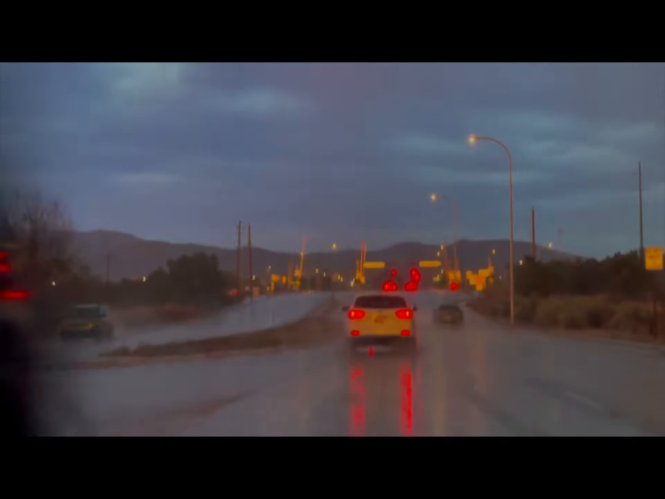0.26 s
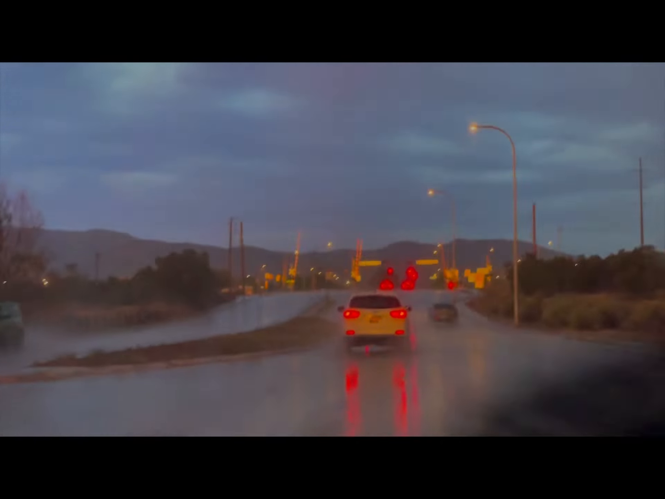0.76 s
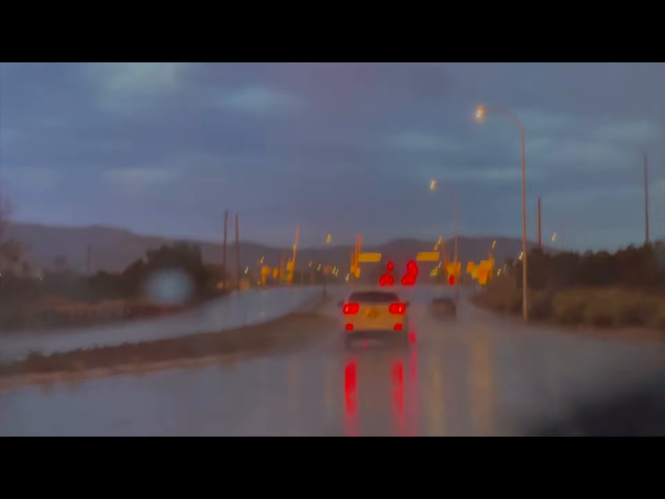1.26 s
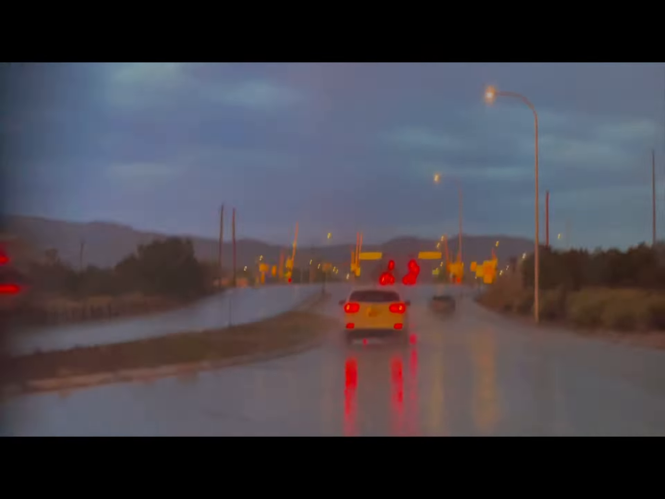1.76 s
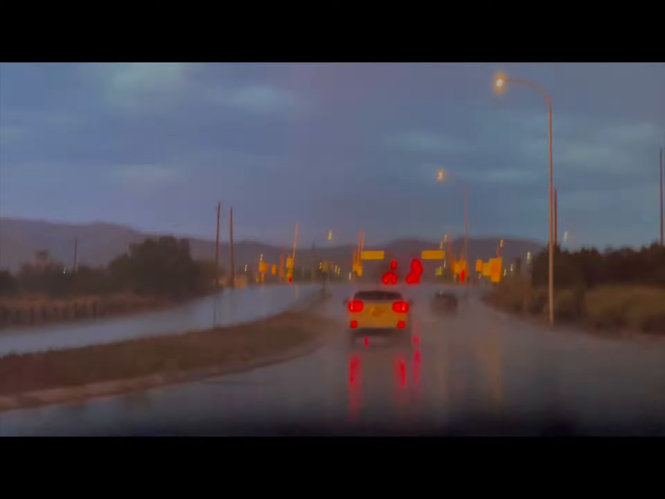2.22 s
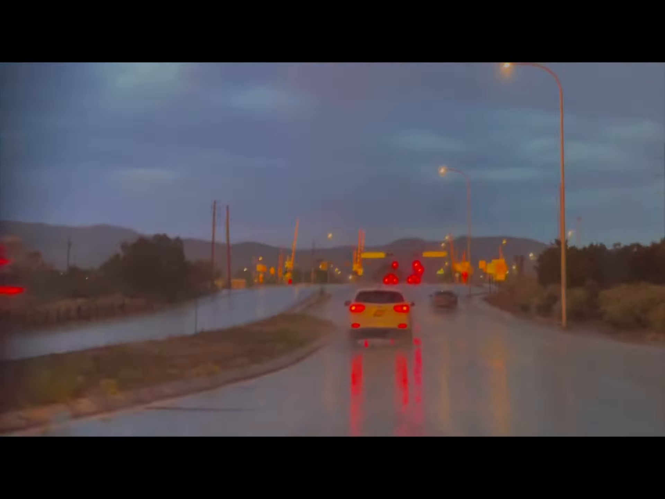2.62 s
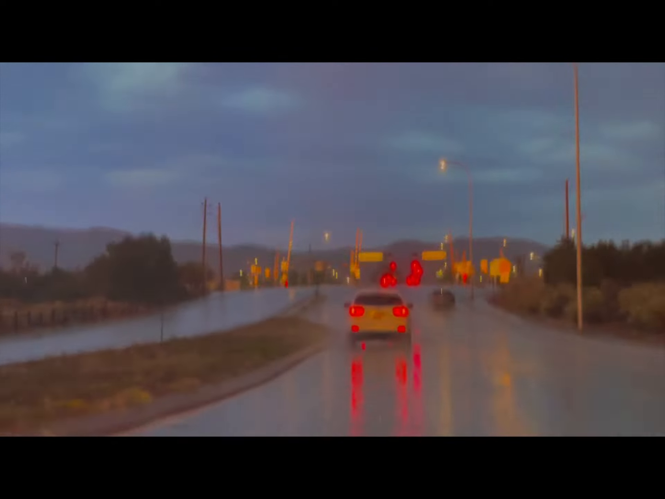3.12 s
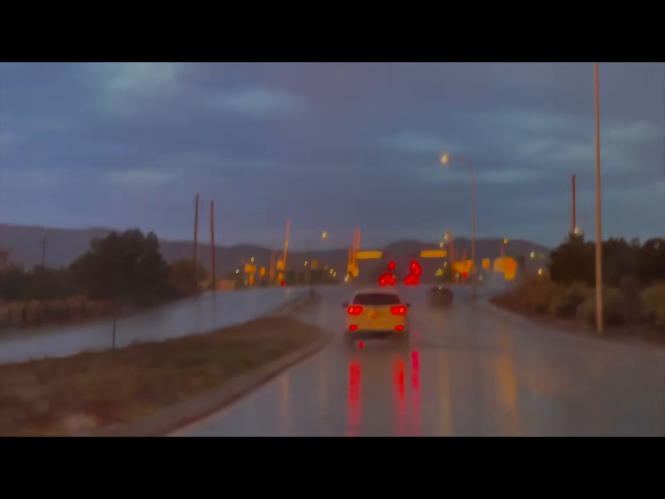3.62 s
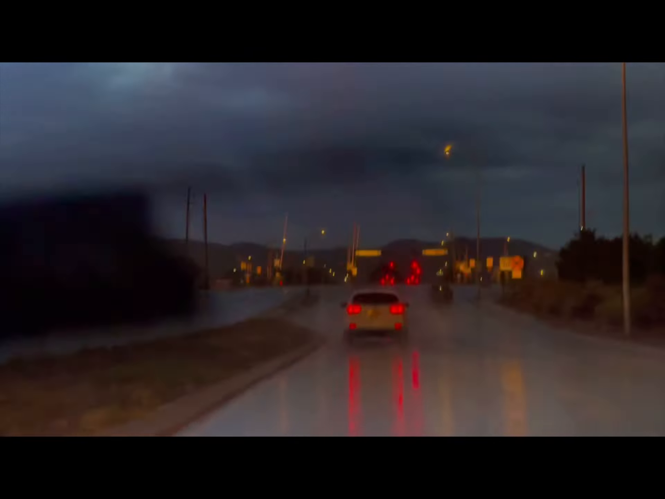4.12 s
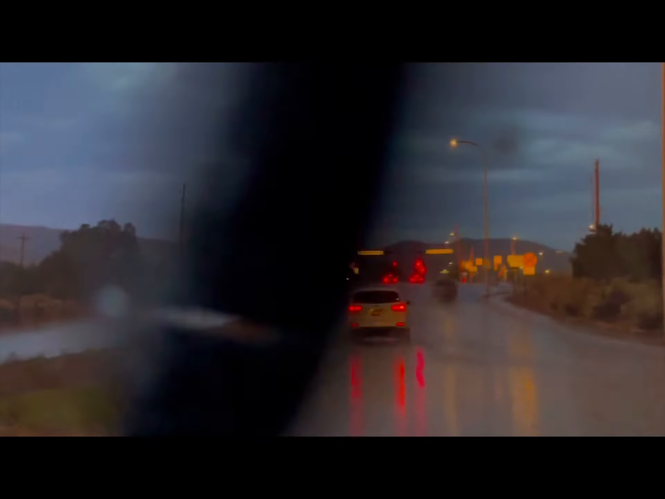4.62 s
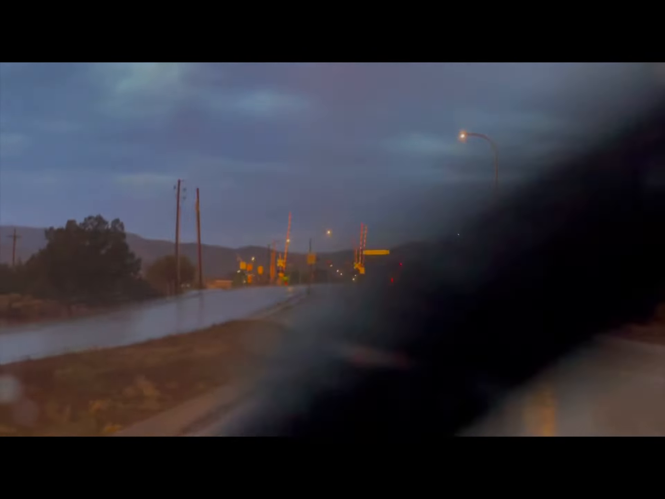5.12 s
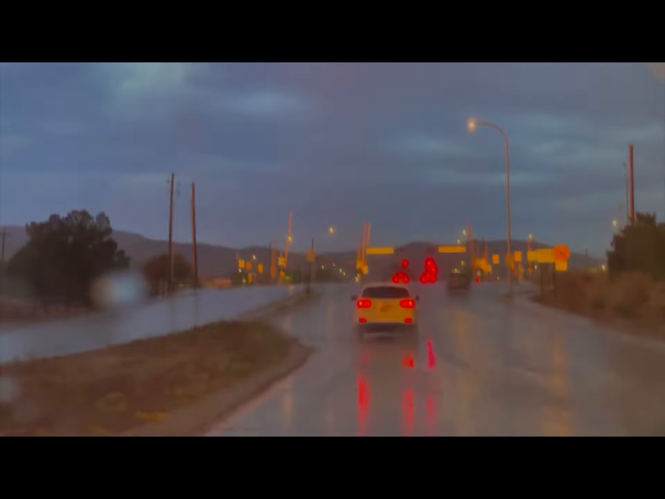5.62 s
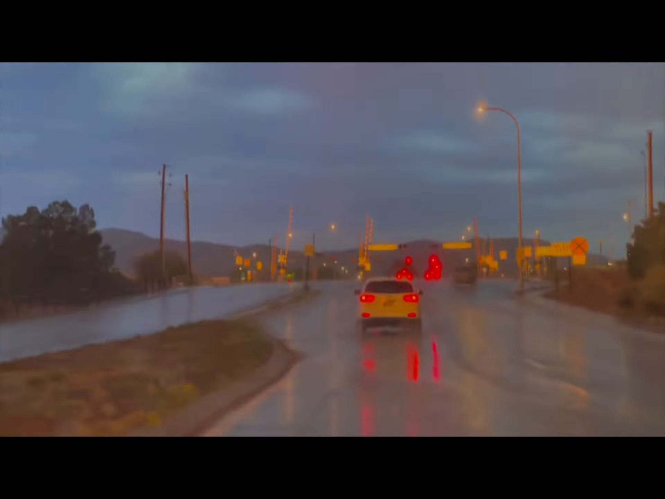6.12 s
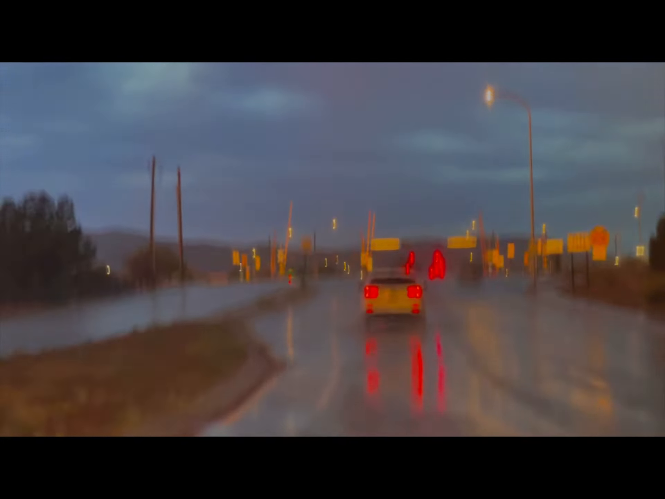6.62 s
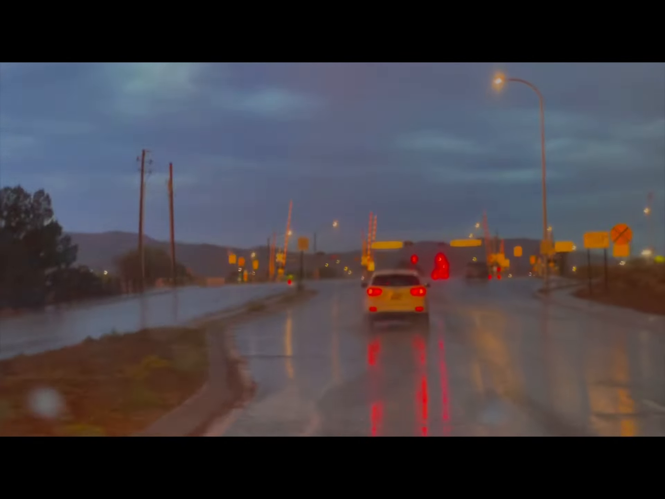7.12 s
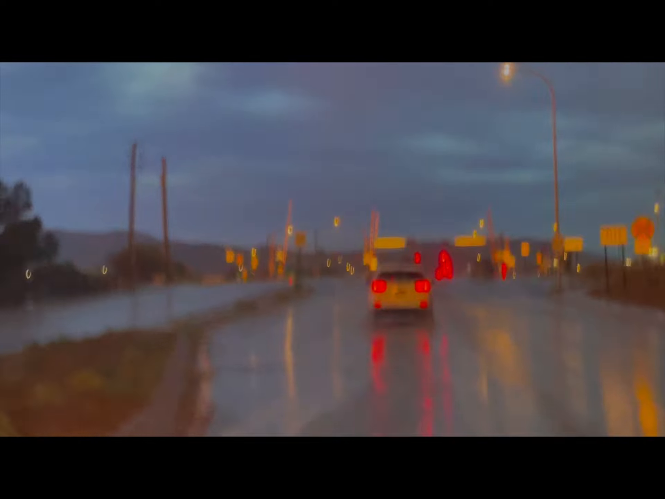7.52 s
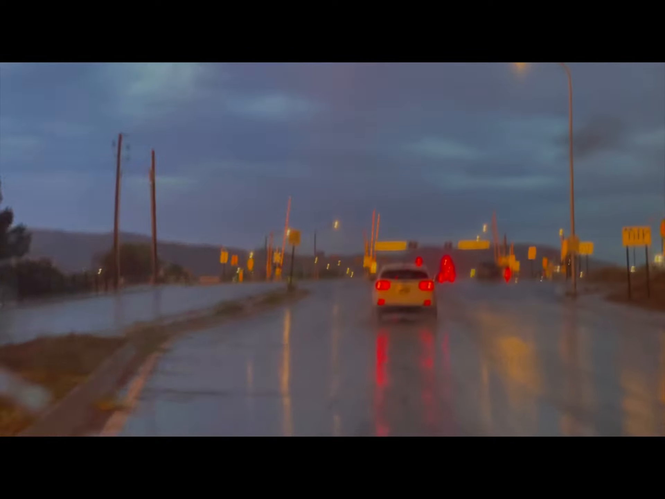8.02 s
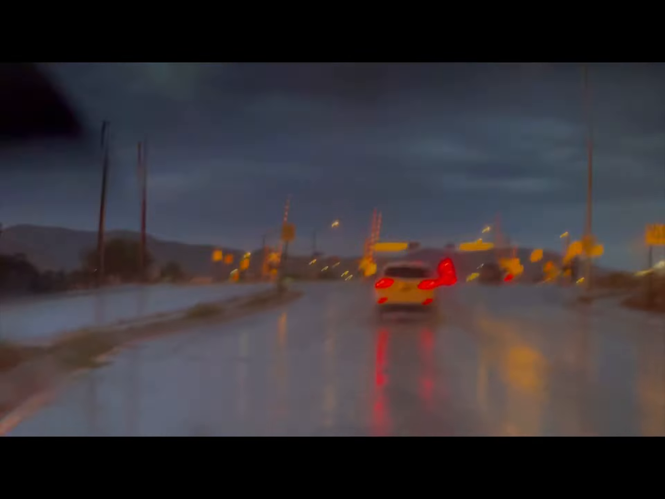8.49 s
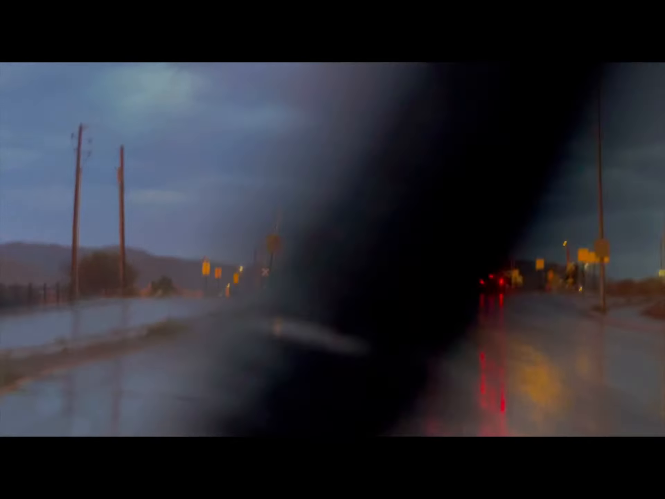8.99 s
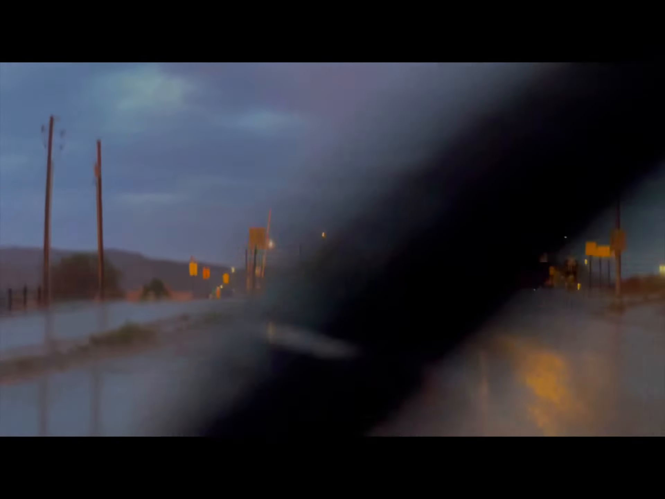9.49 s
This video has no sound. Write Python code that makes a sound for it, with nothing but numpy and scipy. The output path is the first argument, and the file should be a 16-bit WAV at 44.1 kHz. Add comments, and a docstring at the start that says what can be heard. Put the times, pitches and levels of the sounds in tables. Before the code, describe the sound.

Close inside a car driving on a wet road in rain. Dense fine patter and sharp, irregular bigger drops tick on the windshield, with soft drumming on the roof. Wipers turn about every 0.43 seconds, alternating a dull, juddering rubber thud at the foot of the glass with a shorter, mostly lighter flip at the pillar. Deep tyre rumble, a wavering low hum and occasional floor knocks lie underneath.

```python
"""Inside a car driving through rain, near a close pair of microphone ports.
Filtered noise makes the tyre rumble on the wet road; a wavering low sine hums, and short low rings knock.
Drops tick and ring on the glass and drum on the roof: noise bursts whose lowest band rings longest.
Wiper blades flip and judder at each turn: shaped noise for the rubber, resonances for the panel below."""
import sys
import numpy as np
from scipy import signal
from scipy.fft import rfft, irfft, next_fast_len
from scipy.io import wavfile
from scipy.ndimage import uniform_filter1d, map_coordinates

SR = 44100
rng = np.random.default_rng(int(sys.argv[2]) if len(sys.argv) > 2 else 0)


def wrap_up_sound(samples):
    """Save the sound to the file named by the first command line argument, as 16-bit audio."""
    columns = np.atleast_2d(samples).T
    # keep every value between -1 and 1, then stretch to whole-number steps
    tamed = np.clip(columns, -1, 1)
    steps = np.round(tamed * 32767).astype(np.int16)
    wavfile.write(sys.argv[1], SR, steps)


N = 429975

# Drive: (time [s], rumble level before its trim [dB], roof drumming level before its trim [dB])
DRIVE = [(0.0, -25.5, -25.5), (1.11, -27, -28.5), (2.52, -24, -26.5), (2.99, -25.5, -29.5),
         (3.31, -23, -28.5), (3.64, -23.5, -26.5), (4.72, -22.5, -29.5), (5.21, -24, -24.5),
         (5.7, -25.5, -26), (6.11, -20, -24), (6.41, -24.5, -25), (7.47, -21.5, -26.5), (8.01, -20, -25.5),
         (8.99, -27, -30), (9.56, -25.5, -27.5), (9.75, -21.5, -25.5)]
RUMBLE_TRIM_DB, ROOF_TRIM_DB = 0.7, 1.5
# Low thumps: brief swells of the rumble, some just after a wiper turn: (time [s], swell [dB])
LOW_THUMPS = [(0.16, 10), (2.74, 4.5), (5.34, 7), (5.81, 6), (6.24, 5), (6.68, 7.5), (7.17, 7), (7.96, 8),
              (8.85, 8), (9.67, 6)]
THUMP_WIDTH_S = 0.028  # from the top of a swell to 1/e of its dB
# Rumble colour: (frequency [Hz], relative density [dB per Hz])
ROAD_COLOUR = [(11, -28), (18, -2), (26, -11), (36, -5.5), (48, -2.5), (61, 0), (76, -1.5), (129, -8),
               (161, -21.5), (183, -21), (221, -8.5), (300, -20.5), (390, -23.5), (660, -120)]
# Cabin booms: (frequency [Hz], width [Hz], lift [dB])
CABIN_BOOMS = [(93.5, 19.3, 4.5), (111.2, 10.4, 8), (184, 4.5, 3), (198.3, 32, 6), (253, 22, 0.5)]
# Low hum, likely the engine: (time [s], level before wavering [dB])
ENGINE = [(0.0, -22.5), (0.95, -19), (3.26, -27), (3.37, -46), (3.8, -22.5), (8.58, -23.5), (8.63, -37),
          (9.75, -24)]
HUM_HZ = 49.6  # centre of a wavering pitch

# Patter of small drops: (time [s], level before lulls [dB])
SHOWER = [(0.0, -28.5), (0.3, -30), (0.6, -35), (1.1, -33), (1.68, -31.5), (2.2, -33.5), (2.36, -32),
          (3.34, -35), (3.67, -29.5), (3.88, -34), (3.91, -30.5), (5.11, -34.5), (5.4, -30.5), (5.65, -30),
          (5.85, -31.5), (6.13, -29), (6.41, -35.5), (6.9, -35), (7.3, -35), (7.65, -34), (7.93, -34.5),
          (8.04, -36), (8.66, -42), (8.69, -34.5), (9.75, -36)]
# Brief dips and lifts of the patter: (time [s], change [dB])
LULLS = [(2.17, -5), (3.04, -6.5), (3.36, -9), (4.65, -8), (6.56, 4.5), (7.41, -5), (8.4, 0.5), (8.63, -4)]
LULL_WIDTH_S = 0.02  # from the centre to 1/e of the dB change
# Big drops: (time [s], level before band offsets [dB], sharpness: treble offset [dB], depth: bass offset [dB])
BIG_DROPS = [(0.0356, -7, -22, -17), (0.0618, -15, -20, -14), (0.0778, -14, -15, -9),
             (0.091, -8.5, -15, -12), (0.1172, -17, -23, -11), (0.186, -19, -21, -16),
             (0.2155, -13, -21, -7), (0.238, -12, -22, -12), (0.2953, -25, -27, -11),
             (0.3072, -14, -29, -11), (0.3322, -10.5, -29, -12), (0.3583, -18, -26, -16),
             (0.42, -18, -30, -13), (0.4777, -8.5, -30, -19), (0.578, -13, -15, -14),
             (0.6629, -12.5, -18, -18), (0.7502, -15.5, -19, -18), (0.8066, -16, -29, -23),
             (0.8271, -14, -29, -18), (0.848, -16, -27, -15), (0.8725, -11, -31, -14),
             (0.9039, -12, -27, -16), (0.926, -14.5, -18, -9), (0.984, -16, -22, -8),
             (0.9952, -16, -25, -8), (1.094, -27, -12, -13), (1.1862, -18, -17, -16),
             (1.2326, -14, -16, -13), (1.2604, -8.5, -21, -14), (1.3184, -17, -18, -12),
             (1.3918, -16, -17, -17), (1.4117, -16, -14, -14), (1.4457, -11.5, -14, -19),
             (1.492, -18, -19, -15), (1.515, -12, -21, -10), (1.5639, -17, -17, -14),
             (1.5988, -22, -20, -16), (1.6537, -18, -21, -18), (1.6717, -20, -14, -10),
             (1.7111, -13, -19, -14), (1.737, -11, -16, -16), (1.7709, -24, -17, -14),
             (1.7919, -22, -25, -9), (1.8413, -14, -11, -14), (1.9074, -17, -14, -14),
             (1.9585, -20, -18, -11), (2.0413, -12, -16, -20), (2.0588, -15, -20, -17),
             (2.0977, -13, -21, -16), (2.2004, -19, -26, -16), (2.225, -15, -30, -20),
             (2.2453, -20, -20, -14), (2.3267, -27, -22, -12), (2.3815, -15, -18, -12),
             (2.4324, -15, -17, -9), (2.481, -23, -9, -13), (2.5167, -22, -14, -14), (2.546, -12, -23, -19),
             (2.5866, -23, -19, -12), (2.613, -10.5, -17, -17), (2.6963, -21, -10, -9),
             (2.7394, -13.5, -13, -14), (2.7731, -17, -19, -13), (2.7936, -10, -28, -19),
             (2.817, -20, -22, -14), (2.8904, -25, -16, -16), (2.9577, -12, -13, -23),
             (3.072, -22, -18, -5), (3.1563, -22, -17, -11), (3.1957, -23, -14, -13),
             (3.265, -23, -26, -14), (3.3064, -23, -18, -14), (3.3364, -17, -14, -13),
             (3.396, -24, -26, -19), (3.4122, -28, -16, -14), (3.4262, -12, -17, -13),
             (3.491, -19, -14, -13), (3.5329, -27, -22, -10), (3.5534, -16, -14, -10),
             (3.6023, -11, -16, -9), (3.6462, -30, -18, -12), (3.7399, -28, -14, -13),
             (3.7917, -21, -24, -17), (3.8821, -25, -13, -15), (3.9011, -18, -16, -14),
             (3.9265, -21, -20, -11), (3.9644, -22, -16, -15), (3.9979, -15, -20, -21),
             (4.0238, -25, -22, -11), (4.0627, -12.5, -14, -15), (4.139, -18, -13, -16),
             (4.1889, -29, -22, -15), (4.233, -8.5, -22, -16), (4.2506, -11, -25, -17),
             (4.2832, -17, -28, -17), (4.3141, -24, -26, -10), (4.4024, -15, -14, -11),
             (4.459, -24, -25, -9), (4.5745, -10, -18, -15), (4.605, -27, -15, -17),
             (4.6294, -15, -20, -23), (4.6594, -15, -24, -18), (4.7187, -11, -22, -13),
             (4.7547, -16, -24, -17), (4.81, -12, -21, -15), (4.8374, -12, -18, -16),
             (4.8552, -9, -23, -16), (4.8774, -20, -18, -12), (4.9168, -19.5, -9, -9),
             (4.9984, -15, -19, -15), (5.041, -10, -20, -10), (5.0739, -15, -24, -13),
             (5.1797, -19, -20, -13), (5.1981, -14, -19, -15), (5.3273, -14, -13, -13),
             (5.3712, -20, -15, -8), (5.3962, -18, -14, -12), (5.4344, -7.5, -18, -13),
             (5.5014, -18, -16, -17), (5.5359, -15, -12, -15), (5.5853, -13, -29, -22),
             (5.6057, -25, -20, -15), (5.6396, -18, -23, -12), (5.6641, -12, -23, -9),
             (5.7888, -23, -15, -10), (5.8706, -14, -14, -18), (5.8901, -10, -23, -20),
             (5.936, -20, -18, -14), (5.9938, -14, -20, -17), (6.0297, -11.5, -18, -13),
             (6.1131, -14, -18, -14), (6.133, -14, -19, -10), (6.1929, -16, -13, -10),
             (6.2388, -19, -18, -12), (6.3335, -27, -21, -11), (6.3465, -24, -19, -16),
             (6.4124, -24, -31, -16), (6.5501, -31, -17, -9), (6.562, -24, -16, -11),
             (6.599, -15, -15, -15), (6.6478, -24, -19, -7), (6.7122, -12, -16, -17),
             (6.7298, -9.5, -27, -19), (6.9018, -15.5, -20, -13), (6.9417, -21, -21, -16),
             (6.9746, -32, -24, -16), (6.9868, -16, -21, -10), (7.1522, -24, -19, -14),
             (7.2061, -11, -25, -18), (7.2365, -11, -23, -19), (7.2714, -18, -21, -13),
             (7.2819, -16, -22, -7), (7.3042, -11.5, -27, -4), (7.3597, -20, -23, -15),
             (7.447, -26, -18, -11), (7.587, -14, -26, -19), (7.8556, -20, -21, -8), (7.883, -19, -21, -7),
             (7.9733, -17, -22, -13), (8.1893, -26, -18, -11), (8.3111, -20, -22, -15),
             (8.3789, -21, -22, -11), (8.4428, -17, -31, -11), (8.4882, -23, -23, -16),
             (8.4996, -13.5, -25, -17), (8.549, -18, -25, -17), (8.5784, -19.5, -17, -14),
             (8.6338, -19.5, -25, -16), (8.6558, -22, -25, -13), (8.6842, -21, -23, -11),
             (8.7635, -26, -22, -6), (8.8598, -15.5, -19, -14), (8.8967, -15.5, -20, -17),
             (8.9436, -24, -18, -13), (9.007, -19, -19, -15), (9.1092, -16, -24, -11),
             (9.2095, -19, -28, -11), (9.2549, -26, -28, -16), (9.3035, -14, -35, -11),
             (9.5323, -28, -22, -10), (9.689, -14, -26, -13), (0.5884, -25, -24, -14),
             (0.7577, -15, -19, -15), (1.1184, -21, -10, -13), (1.1484, -20, -12, -15),
             (1.2134, -15, -17, -14), (1.6884, -14, -19, -14), (2.0704, -18, -18, -14),
             (2.2844, -18, -16, -15), (2.393, -12, -14, -13), (2.603, -17, -21, -17),
             (3.1154, -12, -25, -20), (3.6674, -14, -15, -14), (3.6914, -15, -20, -13),
             (4.3644, -27, -15, -11), (4.5524, -18, -16, -15), (4.7344, -18, -23, -17),
             (6.3011, -17, -17, -16), (6.3554, -19, -19, -17), (6.3794, -25, -16, -12),
             (6.8284, -22, -6, -15), (6.9134, -23, -17, -13), (7.1694, -20, -18, -12),
             (7.3692, -17, -24, -14), (7.4884, -19, -10, -15), (7.5068, -21, -8, -11),
             (7.9099, -18, -15, -4), (8.529, -17.5, -20, -17), (8.7814, -20, -18, -6),
             (9.6265, -17, -18, -5), (0.025, -18, -13, -14), (0.163, -19, -13, -14), (0.624, -22, -16, -14),
             (0.773, -24, -15, -14), (0.888, -23, -15, -14), (1.193, -18, -14, -14),
             (1.2725, -20, -14, -14), (1.428, -18, -14, -14), (1.451, -18, -12, -14),
             (1.541, -18, -14, -14), (1.615, -24, -16, -14), (1.7856, -21, -14, -14),
             (1.9833, -20, -14, -13.5), (2.0155, -20, -15, -14), (2.148, -22, -15, -14),
             (2.4627, -20, -13, -14), (2.705, -17, -13, -14), (3.0956, -21, -16, -14),
             (3.172, -21, -14, -14), (3.222, -23, -15, -14), (3.3746, -22, -14, -14),
             (3.570, -19, -12, -14), (3.6785, -18, -12, -14), (3.717, -21, -14, -14),
             (3.894, -18, -12, -14), (4.926, -17, -13, -14), (5.206, -20, -14, -14), (5.258, -19, -16, -10),
             (5.276, -20, -14, -14), (5.4104, -18, -12, -14), (5.487, -20, -13, -14),
             (5.564, -18, -13, -14), (5.8644, -19, -13, -14), (5.950, -20, -13, -14),
             (6.050, -19, -13, -14), (6.092, -20, -14, -14), (6.3087, -23, -15, -14),
             (6.5844, -22, -15, -14), (6.616, -24, -15, -14), (7.456, -23, -15, -14),
             (7.8056, -24, -16, -14), (8.926, -22, -15, -14), (9.078, -26, -15, -14),
             (9.383, -21, -15, -14), (9.705, -23, -15, -14)]
# Roof drumming colour: (frequency [Hz], relative density [dB per Hz])
ROOF_COLOUR = [(88, -25), (150, 3), (167, 0.5), (183, -1.5), (221, -6.5), (429, -14), (618, -17),
               (724, -22), (1600, -36.5), (2080, -28), (3520, -120)]
# Glass colour: (frequency [Hz], relative density [dB per Hz])
GLASS_COLOUR = [(470, -12.5), (800, -0.5), (953, -4.5), (1240, -2.5), (1570, -5), (2570, -0.5),
                (3000, -2.5), (3280, -1), (3550, -5), (4180, -8), (4900, -9), (5280, -7.5), (5750, -15),
                (6200, -11.5), (6600, -14), (7080, -13), (8770, -30.5), (10000, -24.5), (11700, -19.5),
                (12900, -19.5), (16000, -29.5)]
# How the pane answers a drop, band by band: (centre [Hz], tick t60 [s], ring t60 [s], ring over tick [dB],
# steady part against the unit-rms splash [ratio], big drop offset [dB], spread of small drop sizes [dB])
PANE = [(1010, 0.009, 0.066, -12, 0.24, 1, 3.0), (2670, 0.0042, 0.024, -8.5, 0.057, -4, 3),
        (5660, 0.0045, 0.029, -9.5, 0.07, 4.5, 5.2), (12000, 0.0051, 0.046, -11.5, 0.081, 17.5, 6.5)]
# First impact of a drop over its splash, one for each band of the pane: level [dB]
STRIKE_DB = [2, 5.5, 8, 10]
SQUALL_DB = 0.6  # slow swing of the drop sizes
SPREAD_S = 0.0011  # a splash takes this long to spread on the pane

# Blades turn, at the foot of the glass (long judder) or at the pillar (short):
# (time [s], level before trims [dB], panel boom over it [dB], judder length [s], second blade [dB])
TURNS = [(0.087, -11, -6, 0.061, 6), (0.952, -10, -5, 0.064, 3), (1.809, -9, -6.5, 0.078, 4.5),
         (2.675, -11.5, -9.5, 0.083, 5.5), (3.53, -10, -1, 0.096, 1.5), (4.399, -9, 0, 0.065, -6),
         (5.26, -9.5, -5, 0.08, 2.5), (6.129, -10, -5, 0.062, -1), (6.997, -9, 2, 0.073, -30),
         (7.852, -11, -2.5, 0.085, 2), (8.718, -10.5, 1, 0.08, 4), (9.578, -11, -1, 0.086, 3),
         (0.611, -17, 1, 0.017, -3), (1.481, -28.5, 9, 0.02, -1), (2.354, -17, 0.5, 0.024, -3),
         (3.185, -26, 8, 0.0107, 3.5), (4.075, -14, -10, 0.013, -3), (4.941, -11, -5, 0.01, -19),
         (5.807, -9.5, -7, 0.0064, -19), (6.68, -32, -5, 0.02, -4), (7.544, -15.5, -7, 0.018, -12),
         (8.404, -20, 1, 0.014, -21), (9.251, -17.5, 0.5, 0.01, -14)]
SHORT_JUDDER_S = 0.04  # judders shorter than this are at the pillar
# Rubber colour: (frequency [Hz], relative density [dB per Hz])
RUBBER_COLOUR = [(140, -15), (240, -3.5), (310, -3), (400, -8.5), (640, -9.5), (950, -20.5), (1400, -24.5),
                 (2200, -31), (4000, -94)]
# The glass and arms favour these in the scrub: (frequency [Hz], width [Hz], lift [dB])
SQUEAL = [(304, 96, 0.5), (420, 60, 3), (606, 52, 4.5), (875, 140, 3.5)]
# Colour of the flip at the pillar against the one at the foot: (frequency [Hz], level [dB])
PILLAR_COLOUR = [(200, 7), (290, 8), (380, 5), (620, -0.5), (1500, -6)]
# Resonances of the panel under the wipers: (frequency [Hz], width [Hz], relative level [dB])
PANEL = [(103, 25.6, -4.5), (201.8, 11, 6.5), (170, 96, -18.5), (406, 24, -13.5), (606, 45, -22)]
PANEL_LAG_S = 0.005  # the panel booms this long after a turn at the foot
PILLAR_LEAD_S = 0.024  # at the pillar the boom is this much earlier, ahead of the rubber
PILLAR_RUB_S = 0.0092  # at the pillar the rubber starts this long before the turn
# The slowing blades rub before each turn: lead, width to 1/e, peak level
RUB_LEAD_S, RUB_WIDTH_S, RUB_DB = 0.06, 0.029, -35.5

# Floor knocks over joints in the road: (time [s], level before trim and soft start [dB], pitch [Hz])
JOLTS = [(0.313, -13, 86.1), (0.484, -12, 69.6), (1.747, -7.5, 144), (1.855, -6, 120), (2.916, -15, 107),
         (3.181, -9, 91), (3.953, -7, 94.2), (5.214, -17, 121), (6.437, -13, 61.9), (6.533, -8, 94.2),
         (6.659, -9, 103), (6.889, -16, 62.4), (6.94, -11, 63.5), (7.159, -4, 89.5), (7.358, -4.5, 97.4),
         (7.509, -8, 61), (8.37, -4, 218), (8.849, -10, 61.9), (9.196, -15, 68)]
JOLT_CYCLES, JOLT_TRIM_DB = 6.6, -3  # cycles in which a knock falls by 20 dB; trim

# Spacing of the ports: (frequency [Hz], their difference against their sum [dB])
PORT_DIFFERENCE = [(30, -25), (60, -17), (80, -15), (110, -10.5), (140, -12.5), (190, -17.0), (260, -10),
                   (340, -8.5), (460, -2.5), (610, -5.5), (820, -1), (1100, -4.0), (1470, -9), (1960, -106),
                   (2620, -15.5), (3510, -13), (4690, -12.5), (6270, -6.5), (8390, 12), (11200, 2),
                   (13000, -13.5), (15000, -30)]
# Share of the difference that is a lead of the left port: (frequency [Hz], signed share [ratio])
LEFT_LEAD = [(1500, 0.074), (2500, 0.54), (5200, .5), (5500, -0.4), (8400, -0.6), (8800, .4), (11500, .65),
             (13500, 0)]
# Balance of the capsules: (frequency [Hz], left over right [dB])
CAPSULE_LEAN = [(60, 1), (240, 1.0), (950, 1.5), (3770, -1), (15000, -0.5)]
TOP_HZ, CEILING = 15850, 0.98  # band limit; sample value that rounded peaks approach


def amp(db):
    """Amplitude factor of a level in dB."""
    return 10 ** (np.asarray(db) / 20)


def unit(x):
    """x scaled to an rms of 1."""
    return x / np.sqrt(np.mean(x ** 2) + 1e-20)


def along(points, hz):
    """Interpolate (frequency [Hz], value) points on a log axis."""
    f, v = np.transpose(points)
    return np.interp(np.log(hz + 1), np.log(f + 1), v)


def curves(rows):
    """One value per sample for each column after the time."""
    s, *cols = np.transpose(rows)
    return [np.interp(np.arange(N) / SR, s, c) for c in cols]


def wobble(rate):
    """A smooth random curve, rate knots a second."""
    knots = rng.standard_normal(int(N * rate / SR) + 4)
    return map_coordinates(knots, [np.arange(N) * rate / SR])


def swells(rows, width):
    """A bell-shaped rise or dip in dB at each (time [s], change [dB]) row."""
    t = np.arange(N) / SR
    return sum(db * np.exp(-((t - s) / width) ** 2) for s, db in rows)


def filtered(x, response):
    """x shaped by a complex response of frequency."""
    m = next_fast_len(N + 8192)
    return irfft(rfft(x, m) * response(np.fft.rfftfreq(m, 1 / SR)), m)[..., :N]


def lifted(peaks):
    """A response raised at each (frequency [Hz], width [Hz], lift [dB]) peak."""
    return lambda f: amp(sum(lift_db / (1 + (2 * (f - c) / w) ** 2) for c, w, lift_db in peaks))


def hiss(spectrum, envelope=1, share=lambda hz: 1, strikes=0):
    """Two unrelated noises under one envelope, plus shared strikes, coloured by a spectrum and a share of it."""
    hz = np.linspace(0, SR / 2, 4096)
    # steady noise gets rms 1 over the whole spectrum, before the share
    scale = np.sqrt(np.mean(amp(along(spectrum, hz)) ** 2))
    source = envelope * rng.standard_normal((2, N)) + strikes
    return filtered(source, lambda f: share(f) * amp(along(spectrum, f)) / scale)


def dying(blows, t60):
    """Envelope of bursts that start at the blows; their powers add and fall 60 dB in t60 seconds."""
    power_fall = amp(-2 * 60 / (max(t60, 5e-4) * SR))
    return np.sqrt(np.abs(signal.lfilter([1], [1, -power_fall], blows ** 2)))


def engine_hum():
    """A low sine whose pitch and level waver, alike at both ports."""
    level = amp(curves(ENGINE)[0] + 0.71 * wobble(7.0))
    pitch_hz = HUM_HZ + 2.193 * wobble(5)
    hum = level * np.sin(2 * np.pi * np.cumsum(pitch_hz) / SR)
    return hum * [[1], [0]]


def road():
    """Tyre rumble through the floor: noise of uneven level with low thumps, lifted at the cabin's booms."""
    level_db = curves(DRIVE)[0] + RUMBLE_TRIM_DB + swells(LOW_THUMPS, THUMP_WIDTH_S)
    lumpy_db = level_db + 2.3 * wobble(9) + 0.96 * wobble(25)
    return filtered(amp(lumpy_db) * hiss(ROAD_COLOUR), lifted(CABIN_BOOMS))


def roof_drumming(drops):
    """The roof skin rings after each drop: dying noise bursts over a steady floor."""
    level_db = curves(DRIVE)[1] + ROOF_TRIM_DB + 2.6 * wobble(3.595)
    drumming = unit(0.6 + unit(dying(drops, 0.053)))
    return hiss(ROOF_COLOUR, amp(level_db) * drumming)


def rain():
    """Random small drops and listed big ones: each is a strike, a tick and a weaker ring in every pane band."""
    patter_db = curves(SHOWER)[0] + swells(LULLS, LULL_WIDTH_S)
    count = int(1300 * N / SR)  # 1300 small drops a second
    at = (rng.random(count) * N).astype(int)
    size = np.clip(rng.standard_normal(count), -3, 1.9)
    squall = amp(SQUALL_DB * wobble(5.7) + 0.69 * wobble(20) + 1.34 * wobble(45))
    s, db, sharp_db, deep_db = np.transpose(BIG_DROPS)
    big_at = (s * SR).astype(int)
    out = roof_drumming(squall * np.bincount(at, amp(4.3 * size), N))
    tilts_db = [deep_db, 0, sharp_db / 2, sharp_db]  # one for each band
    for k, (_, tick, ring, ring_db, steady, big_db, spread_db) in enumerate(PANE):
        def splash(blows):
            return np.hypot(dying(blows, tick), amp(ring_db) * dying(blows, ring))

        colour_db = 3.4 * rng.standard_normal(count)  # where a drop lands decides how it excites this band
        small = squall * np.bincount(at, amp(spread_db * size + colour_db), N)
        big = np.bincount(big_at, amp(db + big_db + tilts_db[k]), N)
        small_splash = splash(small)
        patter = amp(patter_db) * unit(np.hypot(steady, unit(small_splash)))
        small_strikes = amp(patter_db - 7.0) * small / np.std(small_splash)
        strikes = amp(STRIKE_DB[k]) * (big + small_strikes)
        envelope = uniform_filter1d(np.hypot(patter, splash(big)), size=round(SPREAD_S * SR))
        # neighbouring bands crossfade in power
        band = [(row[0], float(i == k)) for i, row in enumerate(PANE)]
        out = out + hiss(GLASS_COLOUR, envelope, lambda hz: np.sqrt(along(band, hz)), strikes)
    return out


def flip(u):
    """Envelope of one blade flipping over: a soft start, then a fall of 60 dB in 0.11 s."""
    return (u > 0) * amp(-60 * np.abs(u) / 0.11) * (1 - np.exp(-np.abs(u) / 0.0073))


def panel(f):
    """Response of the panel under the wipers: resonances of alternating sign."""
    return sum((-1) ** k * amp(db) * 1j * f * w / (c * c - f * f + 1j * f * w)
               for k, (c, w, db) in enumerate(PANEL))


def wipers():
    """At each turn the two rubber blades flip one after the other, judder and shake the panel."""
    scrub = np.zeros((2, N + SR))  # rows: foot of the glass with all the rubs, pillar
    boom, knocks = np.zeros(N + SR), np.zeros(N + SR)
    t = np.arange(SR // 2) / SR

    def add(track, start_s, sound):
        track[round(start_s * SR):][:len(t)] += sound

    rub = amp(RUB_DB) * np.exp(-((t - RUB_LEAD_S) / RUB_WIDTH_S) ** 2)
    for s, db, boom_db, length, second_db in TURNS:
        at_pillar = int(length < SHORT_JUDDER_S)
        early = s - at_pillar * PILLAR_LEAD_S
        judder = 0.71 * np.clip(t / 0.013, 0, 1) * np.clip((length + 0.04 - t) / 0.041, 0, 1)
        shape = 0.8 * flip(t) + 0.91 * amp(second_db) * flip(t - length * 0.71) + judder
        add(scrub[at_pillar], s - at_pillar * PILLAR_RUB_S, amp(db - 12.5) * shape)
        add(scrub[0], max(s - 2 * RUB_LEAD_S, 0), rub)
        add(boom, early + PANEL_LAG_S, amp(db + boom_db - 6.5) * shape)
        # one knock on the panel for each blade
        knock_db = db + boom_db + 25.0
        knocks[round((early + PANEL_LAG_S / 2) * SR)] += amp(knock_db - 3.5)
        knocks[round((s + length * 0.85) * SR)] += amp(knock_db + second_db - 2.5)
    shake = rng.standard_normal((2, N))
    scale = np.std(filtered(shake, panel))
    grip = amp(1.8 * wobble(55))  # the rubber grips and slips unevenly
    foot = hiss(RUBBER_COLOUR, grip * scrub[0, :N], lifted(SQUEAL))
    pillar = hiss(RUBBER_COLOUR, scrub[1, :N], lambda hz: amp(along(PILLAR_COLOUR, hz)))
    thud = filtered(boom[:N] * shake + knocks[:N], panel) / scale
    return foot + pillar + thud


def jolts():
    """Each knock of the floor is a short, low, decaying sine with a soft start."""
    out, t = np.zeros(N + SR), np.arange(SR // 4) / SR
    for s, db, hz in JOLTS:
        decay = amp(db + JOLT_TRIM_DB - 20 * t * hz / JOLT_CYCLES)
        knock = decay * np.sin(2 * np.pi * hz * t) * (1 - np.exp(-t / 0.0035))
        out[round(s * SR):][:len(t)] += knock
    return out[:N] * [[1], [0.6]]


def scene():
    """Row 0 reaches both ports alike; row 1 is the cabin's scattered sound, which differs between them."""
    alike, scattered = road() + engine_hum() + rain() + wipers() + jolts()

    def lead(hz):
        return np.clip(along(LEFT_LEAD, hz), -1, 1)

    # a quarter-cycle shift turns part of the shared sound into a lead between the ports
    side = filtered(alike, lambda hz: amp(along(PORT_DIFFERENCE, hz)) * 1j * lead(hz))
    side = side + filtered(scattered, lambda hz: amp(along(PORT_DIFFERENCE, hz)) * np.sqrt(1 - lead(hz) ** 2))
    return np.array([alike + side, alike - side])


def record(dry):
    """The left capsule hears more bass, the input rounds off high peaks, nothing passes the band limit."""
    leaning = filtered(dry, lambda hz: amp(along(CAPSULE_LEAN, hz) / 2 * [[1], [-1]]))
    rounded = leaning / (1 + np.abs(leaning / CEILING) ** 6) ** (1 / 6)
    return filtered(rounded, lambda hz: hz < TOP_HZ)


dry = scene()
out = record(dry)
wrap_up_sound(out)
```